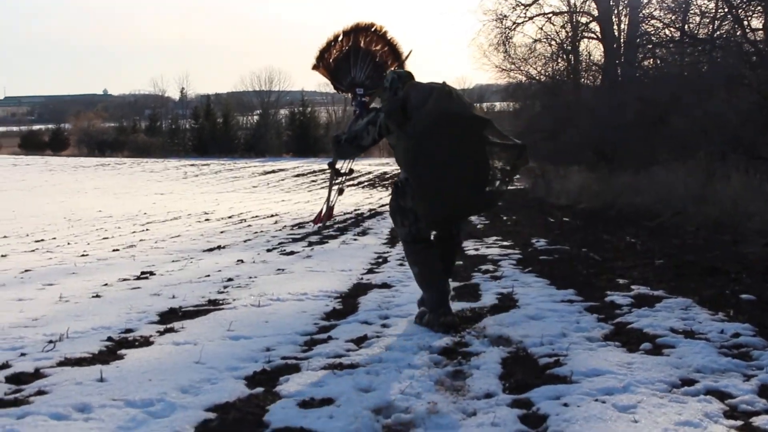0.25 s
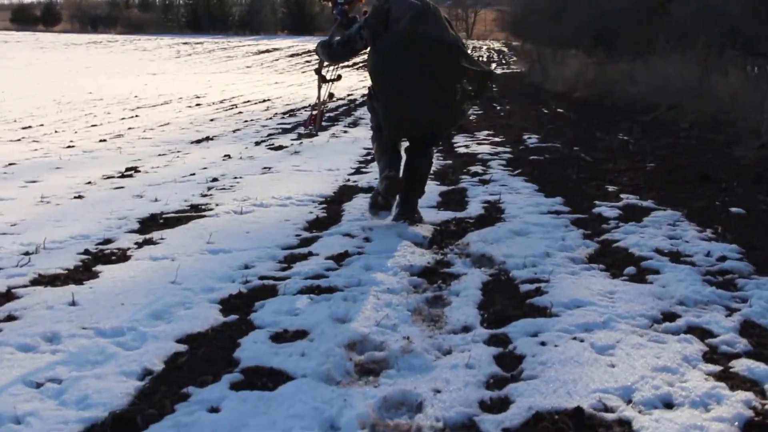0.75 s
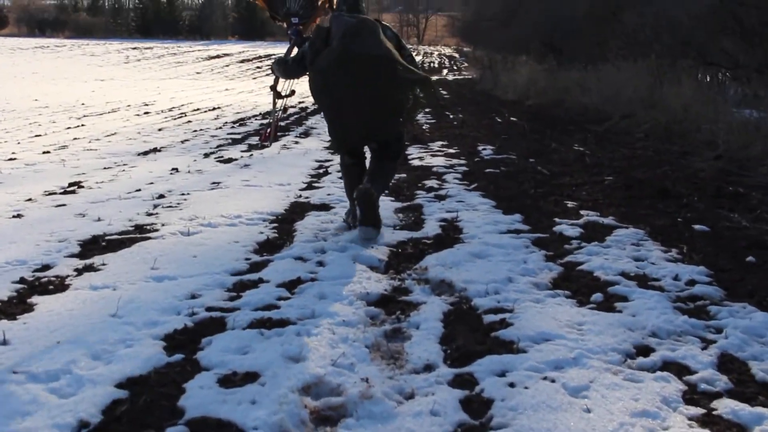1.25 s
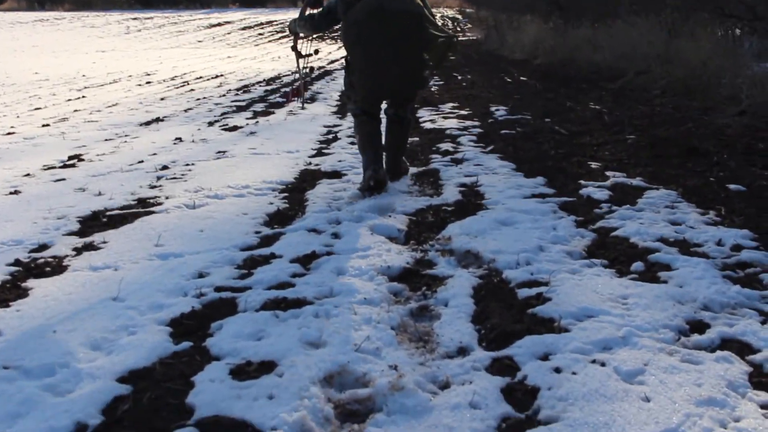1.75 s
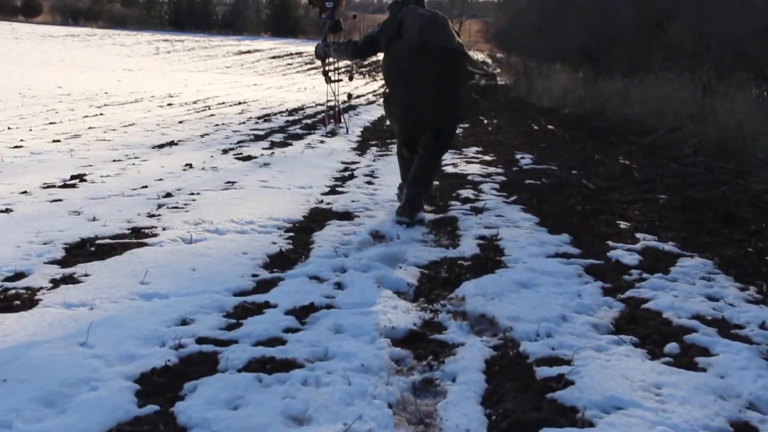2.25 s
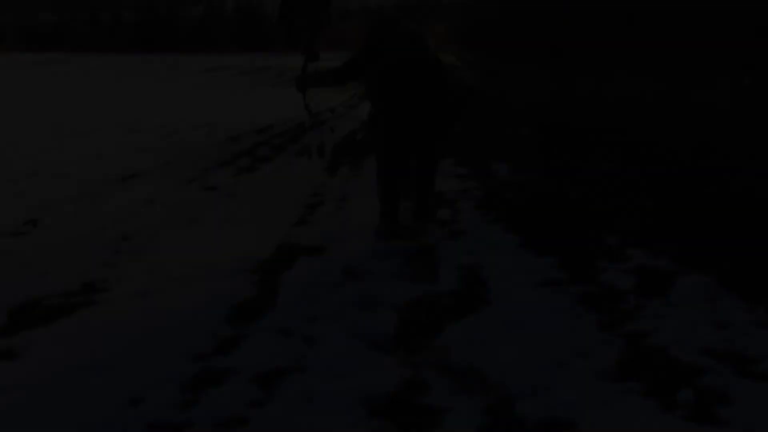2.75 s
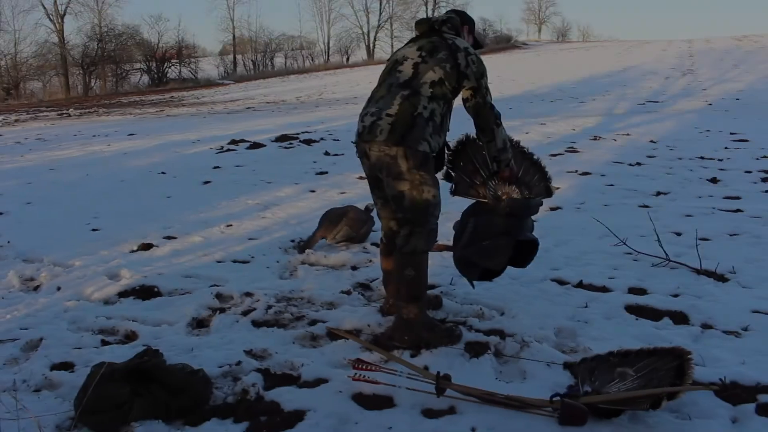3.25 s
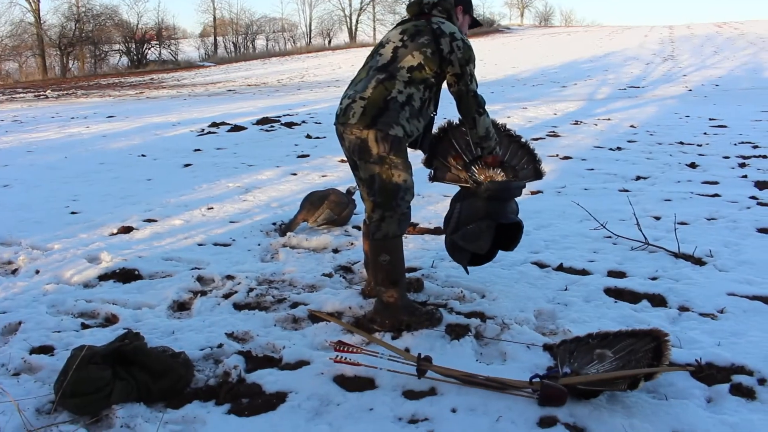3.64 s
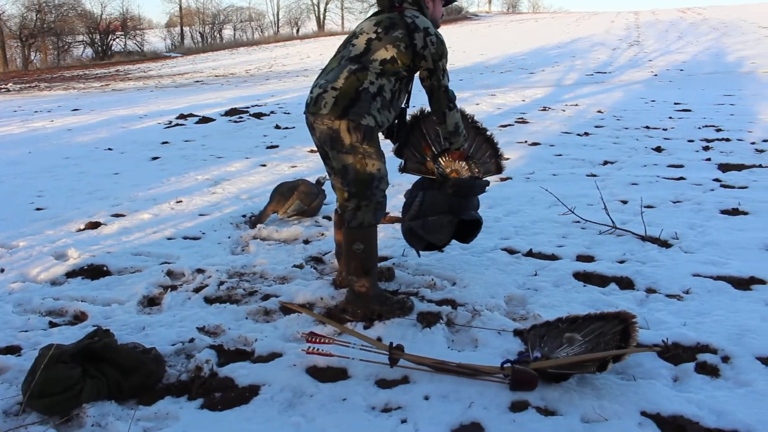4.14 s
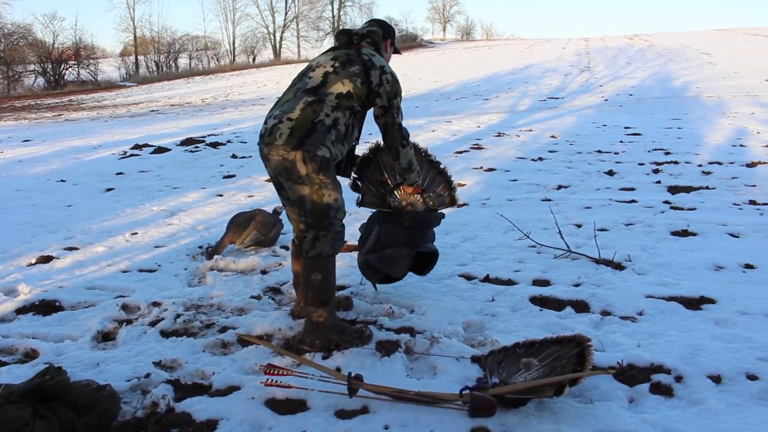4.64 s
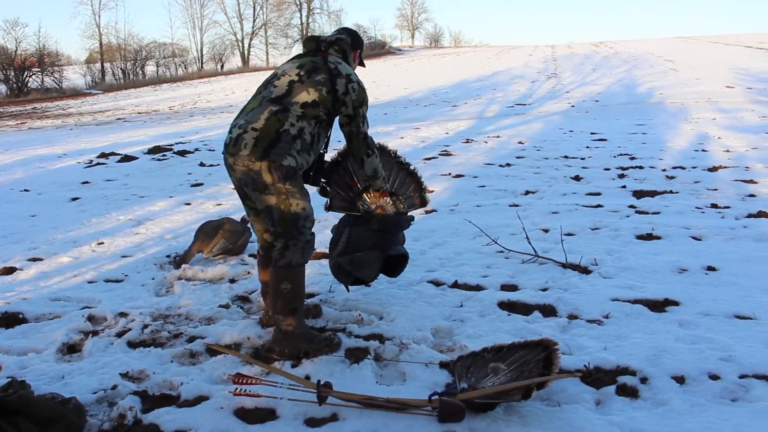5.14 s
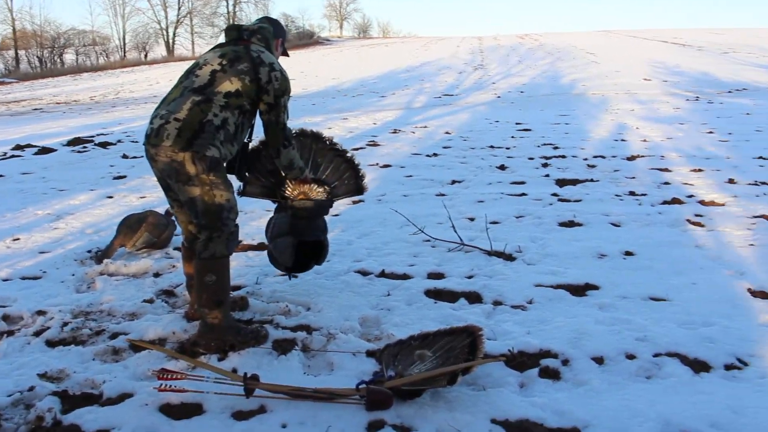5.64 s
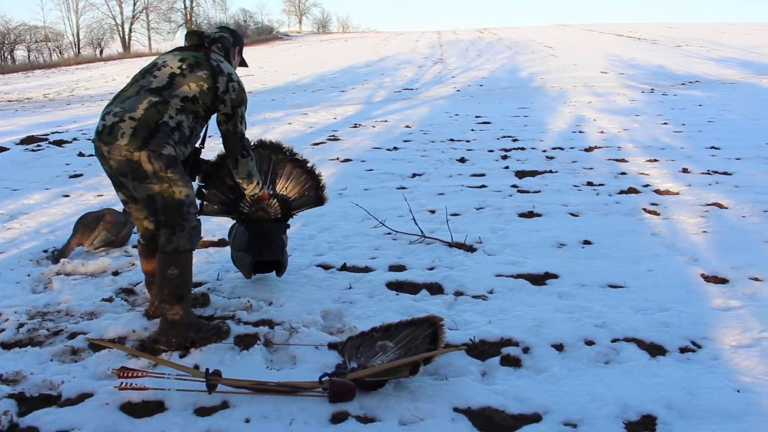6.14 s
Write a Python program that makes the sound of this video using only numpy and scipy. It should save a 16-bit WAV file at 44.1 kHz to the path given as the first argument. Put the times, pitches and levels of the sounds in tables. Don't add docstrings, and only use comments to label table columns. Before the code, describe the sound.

Close, uneven wind blasts overload a hand-held microphone with deep rumble while crisp snow crunches and creaks underfoot. The wind drops away, gritty gear scrapes over the crust, and a soft open field remains, with distant traffic, a low engine drone and thin bird chirps. Two clusters of hollow plastic knocks follow, the first short and dull, the second louder, clattering and ringing.

```python
import sys
import numpy as np
from scipy import signal
from scipy.fft import rfft, irfft, next_fast_len
from scipy.io import wavfile
from scipy.ndimage import uniform_filter1d

SR = 44100
rng = np.random.default_rng(int(sys.argv[2]) if len(sys.argv) > 2 else 0)


def master_out(mix):
    frames = np.transpose(np.atleast_2d(mix))
    ceiling = np.clip(frames, -1, 1)
    pcm = np.round(ceiling * 32767).astype(np.int16)
    wavfile.write(sys.argv[1], SR, pcm)


def boost_factor(decibels):
    exponent = np.asarray(decibels, float) / 20
    return 10 ** exponent


N = 282680
T = np.arange(N) / SR
PAD = next_fast_len(N)
FADE_FROM_S, FADE_TO_S = 2.696, 3.27
WINDY = np.clip((FADE_TO_S - T) / (FADE_TO_S - FADE_FROM_S), 0, 1)


def unit(x):
    return x / np.sqrt(np.mean(x ** 2))


def colour(x, points):
    hz, db = np.transpose(points)
    log_hz = np.log(np.arange(PAD // 2 + 1) * SR / PAD + 1e-3)
    gain = boost_factor(np.interp(log_hz, np.log(hz), db, left=-90, right=-90))
    return unit(irfft(rfft(x, PAD) * gain, PAD)[:N])


def ring(x, modes):
    total = 0
    for hz, width, db in modes:
        total = total + boost_factor(db) * unit(signal.lfilter(*signal.iirpeak(hz, hz / width, SR), x))
    return total


def walk(rate):
    hold = int(SR / rate)
    steps = np.repeat(rng.standard_normal(N // hold + 1), hold)
    return 1.3 * uniform_filter1d(uniform_filter1d(steps, hold), hold)[:N]


def grains(spread_db, hold):
    size = np.minimum(rng.exponential(size=N // hold + 1), 3.5)
    return rng.standard_normal(N) * boost_factor(spread_db * np.repeat(size, hold)[:N])


def lively(points, drift_db, flicker_db, rate, slaps=0):
    spectrum = rfft(colour(rng.standard_normal(N) + slaps, points), PAD)
    half_octave = 2 * np.log2(np.arange(len(spectrum)) * SR / PAD + 1e-3)
    first, last = int(2 * np.log2(points[0][0])), int(2 * np.log2(points[-1][0])) + 1
    out = 0
    for k in range(first, last + 1):
        share = np.cos(np.pi / 2 * np.clip(half_octave - k, -1, 1)) ** 2
        level_db = drift_db * walk(rate / 8) + flicker_db * walk(rate)
        out = out + irfft(spectrum * share, PAD)[:N] * boost_factor(level_db)
    return unit(out)


def burst(length_s, rise_s, fall_s):
    t = np.arange(int((length_s + 6 * fall_s) * SR)) / SR
    return np.minimum(t / rise_s, 1) * np.exp(-np.maximum(t - length_s, 0) / fall_s)


def bell(s, width_s):
    return np.exp(-.5 * ((T - s) / width_s) ** 2)


def swells(rows, width_s=None):
    return sum(boost_factor(row[1]) * bell(row[0], width_s or row[2]) for row in rows)


def add(out, s, x):
    i = int(s * SR)
    out[i:i + len(x)] += x[:N - i]


def echo(x, db, fade_s):
    t = np.arange(SR // 4) / SR
    tail = boost_factor(db) * rng.standard_normal(len(t)) * np.exp(-t / fade_s)
    return x + signal.fftconvolve(x, tail)[:N]


def distance():
    # pitch in Hz, level in dB per Hz.
    road_tone = [(260, -13), (340, -7.5), (480, -5.5), (600, -6.5), (800, -6.5), (1050, -12), (1670, -25.5),
                 (2600, -33.5), (3400, -62)]
    rumble_tone = [(140, -24), (190, -0.5), (240, 1), (330, -4), (430, -11)]
    hiss_tone = [(2120, -16), (3600, 0.5), (3850, -2), (5630, -6), (6210, -6), (7070, -6), (15600, -8)]
    chorus_tone = [(2300, -1.0), (2900, 2), (3300, 4), (3750, -15.0)]
    # pitch in Hz, width in Hz, level in dB.
    engine_tones = [(727.3, 13.4, 1), (498.5, 27, -1), (807, 5, -4), (373, 2.4, -10)]
    # middle in seconds, level in dB, width in seconds.
    engine_swells = [
        (3.56, -46.5, .04),
        (4.25, -43.5, 0.22),
        (4.8, -48.5, 0.33),
        (5.35, -46, 0.054),
        (5.85, -45.5, 0.19),
    ]
    # middle in seconds, level in dB, width in seconds.
    passes = [
        (.15, -43, 0.14),
        (1.5, -55, 0.37),
        (2.55, -48.5, 0.11),
        (3.45, -50, 0.3),
        (4.82, -49, 0.13),
        (5.55, -63, 0.07),
    ]
    # middle in seconds, level in dB, width in seconds.
    lorry = [
        (4.6, -41.5, 0.33),
    ]
    # middle in seconds, level in dB.
    flocks = [(0, -53), (.52, -55), (.72, -65), (1.25, -60), (1.55, -74), (1.88, -56), (2.42, -50),
              (2.72, -54), (3.1, -55.5), (3.45, -53), (4.04, -62), (4.55, -64), (4.85, -51), (5.1, -65),
              (5.48, -63), (5.9, -71)]

    drone = swells(engine_swells) * ring(rng.standard_normal(N), engine_tones)
    road_gain = WINDY * boost_factor(-34) + (1 - WINDY) * boost_factor(-42.5) + swells(passes)
    road = road_gain * lively(road_tone, drift_db=1.2, flicker_db=0.93, rate=10)
    rumble_gain = (1 - WINDY) * (boost_factor(-40) + swells(lorry))
    rumble = rumble_gain * lively(rumble_tone, drift_db=-0.1, flicker_db=2.5, rate=12)
    chorus_gain = boost_factor(-60) + swells(flocks, width_s=0.1)
    chorus = chorus_gain * lively(chorus_tone, drift_db=-3.0, flicker_db=0.5, rate=15.9)
    hiss = boost_factor(-58) * colour(rng.standard_normal(N), hiss_tone)
    return road + rumble + drone + chorus + hiss


def birds():
    # start in seconds, length in seconds, pitch in Hz, level in dB.
    whistles = [(.068, .048, 2375, -46), (2.17, .04, 2365, -43), (3.73, .04, 2222, -52),
                (4.232, .055, 2513, -52), (5.787, .06, 2180, -49), (2.556, .032, 2650, -46),
                (2.66, .035, 2250, -52), (5.73, .03, 2670, -55), (4.585, .095, 3290, -52),
                (4.91, .16, 3260, -50), (5.09, .09, 3270, -55), (4.93, .13, 3000, -55),
                (5.42, .1, 3315, -49.5), (5.44, .09, 3040, -56), (3.53, .07, 2060, -60),
                (3.66, .04, 2665, -57), (4.28, .07, 1970, -59), (5.545, .03, 1985, -59),
                (4.696, .034, 2890, -45), (6.105, .035, 7350, -60), (5.363, .016, 2260, -47),
                (3.675, .022, 2100, -53), (4.69, .03, 3300, -53), (5.28, .02, 3300, -52)]
    # start in seconds, length in seconds, from Hz, to Hz, level in dB.
    slides = [
        (0, .045, 2750, 2450, -46),
        (5.315, .014, 3200, 2500, -42),
        (2.048, .095, 3680, 2500, -50),
        (5.202, .09, 3720, 2430, -38),
        (5.185, .02, 3740, 3640, -54),
        (6.24, .07, 3350, 2800, -48),
        (5.324, .05, 2290, 2170, -45),
        (2.58, .035, 2600, 2120, -47),
        (4.68, .02, 2300, 2850, -50),
    ]
    # start and length in seconds, edge Hz, middle Hz, level in dB.
    bends = [
        (4.12, .11, 3300, 2800, -48.5),
        (5.309, .021, 2350, 3280, -44),
        (.047, .022, 2350, 3250, -45),
        (5.692, .06, 2000, 2660, -51),
    ]
    peak_at = .28
    sag_db = 16
    level_notes = [(s, length_s, hz, hz, db) for s, length_s, hz, db in whistles]

    def slide(u):
        return 1 - (1 - u) ** 1.5

    def bend(u):
        return 1 - np.abs(2 * u - 1) ** 2.4

    out = np.zeros(N)
    waver = 1 + .003 * walk(90)
    for notes, shape, loss_db in (level_notes, slide, sag_db / 3), (slides, slide, sag_db), (bends, bend, 0):
        for s, length_s, from_hz, to_hz, db in notes:
            u = np.arange(int(length_s * SR)) / (length_s * SR)
            edge = np.clip(np.minimum(u * length_s + 0.00089, (1 - u) * length_s) / 0.0058, 0, 1)
            gain = edge * boost_factor(db - loss_db * np.abs(u - peak_at) / (1 - peak_at))
            pitch_hz = (from_hz + (to_hz - from_hz) * shape(u)) * waver[int(s * SR):][:len(u)]
            add(out, s, np.sqrt(2) * gain * np.sin(2 * np.pi * np.cumsum(pitch_hz) / SR))
    return echo(out * boost_factor(1.8 * walk(120)), db=-35, fade_s=.035)


def wind():
    # time in seconds, level in dB.
    gusts = [(0, -22), (.25, -13), (.5, -15), (.7, -20.5), (.85, -16.5), (1.0, -16), (1.31, -20.5),
             (1.55, -15), (1.75, -23.5), (2.05, -23.5), (2.3, -21), (2.45, -22.5), (2.65, -21), (2.8, -20),
             (3.0, -17.5), (3.2, -17.5)]
    # time in seconds, boost in dB, eddy size from 0 small to 1 big.
    buffets = [(0, 16.5, 0.77), (.04, -3.5, 0.41), (.19, 0, 0.86), (.27, 2.5, 0.8), (.35, -4, 0.45),
               (.39, -0.5, .1), (.46, -3, 0.7), (.64, -6, 0.93), (0.771, 4, 0.6), (.99, 1, .2),
               (1.05, 3.5, 0.65), (1.25, -0.5, 0.73), (1.36, 1, .4), (1.478, 7, 0.36), (1.54, -3, 0.61),
               (1.639, 12, 0.78), (1.69, -17, 0.97), (1.84, 3.5, 1), (1.91, 5, 0.16), (1.94, 6, 0.92),
               (1.97, 8.5, .1), (2.08, 8.5, 0.84), (2.23, -13, 0.84), (2.3, 3.5, .1), (2.4, -7, 0.18),
               (2.5, 4, 0.99), (2.54, -4, 0.088), (2.6, 7, 0.76), (2.68, 5, .1), (.09, 0, .5),
               (.15, 2.5, .5), (.23, 2, .3), (.31, -0.5, .4), (.43, 3, .5), (.51, -2.5, .6), (.58, 1, .3),
               (.7, 0.5, .5), (.82, 2, .4), (.88, -1.5, .5), (.93, 0.5, .5), (1.11, -1, .5), (1.17, 1, .4),
               (1.21, 1.5, .3), (1.3, -3, .5), (1.42, -1, .5), (1.59, 2, .5), (1.77, 0.5, .5),
               (2.02, 0, .5), (2.15, 0, .5), (2.75, -1, .5), (2.82, 1, .5), (2.9, 0, .5), (2.98, 0.5, .5),
               (3.07, -1, .5)]
    # pitch in Hz, level in dB per Hz.
    heave_tone = [(8.8, -50), (15, 3), (42, 2), (68, 5), (95, -3), (120, 1), (200, -120)]
    flutter_tone = [(50, -15.5), (70, -5), (115, -0.5), (160, -7.5), (200, -21)]
    rattle_tone = [(135, -33), (170, 1), (230, -1.5), (310, -12.5), (420, -21.5)]
    breeze_tone = [(15, 2), (30, -4), (65, 0), (100, -8.5), (140, -3.5), (180, -9.5)]

    slaps = boost_factor(-1.5) * unit((rng.random(N) < 45 / SR) * rng.random(N))
    gust_db = np.interp(T, *np.transpose(gusts))
    big_db, small_db = gust_db, gust_db
    for s, db, size in buffets:
        boost_db = db * bell(s, width_s=0.023)
        big_db = big_db + np.clip(2 * size, 0, 1) * boost_db
        small_db = small_db + np.clip(2 - 2 * size, 0, 1) * boost_db

    heave = boost_factor(big_db - 1.5) * lively(heave_tone, drift_db=-3.5, flicker_db=1.0, rate=8.1)
    flutter = boost_factor(small_db) * lively(flutter_tone, drift_db=1.0, flicker_db=2.04, rate=26, slaps=slaps)
    rattle_db = -6.5 - 2.5 * T + small_db + 0.13 * (small_db + 19)
    rattle = boost_factor(rattle_db) * lively(rattle_tone, drift_db=3.0, flicker_db=0.5, rate=16.4, slaps=slaps)
    breeze = boost_factor(-38.5) * lively(breeze_tone, drift_db=-0.9, flicker_db=1.5, rate=10)
    wind_db = -.7
    total = WINDY * boost_factor(wind_db) * (heave + flutter + rattle) + (1 - WINDY) * breeze
    push = 0.18 * total ** 2
    return total + push - uniform_filter1d(push, size=2000)


def boots():
    # start in seconds, level in dB, dull share in dB, length in seconds.
    crunches = [(0.18, -50.5, -3, 0.052), (0.208, -40.5, -25, 0.025), (0.383, -55, 3, 0.053),
                (0.439, -52, 4, 0.081), (0.604, -52.5, 12.5, 0.036), (0.749, -57, 13, 0.019),
                (0.794, -54.5, 3, 0.047), (1.016, -47.5, -3, 0.08), (1.127, -62, 15.5, 0.087),
                (1.225, -47.5, 6, 0.014), (1.389, -58.5, 10.5, 0.037), (1.44, -55, -9, 0.041),
                (1.523, -63, 1, .012), (1.565, -59, 11, 0.014), (1.669, -50.5, 0, 0.065),
                (1.74, -57.5, 12, 0.063), (1.869, -58.5, 16.5, 0.016), (1.905, -46.5, 6, 0.007),
                (2.205, -51, 10.5, 0.007), (2.268, -51, 7.5, 0.056), (2.506, -55, 5, 0.053),
                (2.689, -49, 0, 0.0083), (2.728, -47, 1, 0.019), (2.774, -37.5, -6.5, 0.037),
                (2.997, -58, 10, 0.0092), (3.087, -58, 15.5, 0.049), (3.141, -43.5, 2, 0.034),
                (3.216, -52.5, 10, 0.02), (3.304, -55.5, 12.5, 0.025)]
    # start in seconds, level in dB.
    ticks = [
        (3.809, -58),
        (3.847, -54),
        (4.398, -63),
        (4.43, -71),
        (5.167, -54),
        (5.234, -49),
        (5.251, -53),
    ]
    # middle in seconds, level in dB.
    steps = [
        (0, -60),
        (.68, -55.5),
        (1.22, -49.5),
        (1.55, -59),
        (1.88, -55),
        (2.12, -60),
        (2.42, -55),
        (2.65, -61),
        (3.15, -54.5),
        (3.42, -57),
    ]
    # time in seconds, level in dB.
    drag = [
        (3.28, -70),
        (3.34, -49),
        (3.39, -38.5),
        (3.45, -43),
        (3.51, -48),
        (3.57, -55),
        (3.72, -62),
        (3.8, -72),
    ]
    # pitch in Hz, width in Hz, level in dB.
    gear_modes = [(2100, 250, -6), (2530, 200, -2), (2950, 300, -2), (3350, 250, -2), (3750, 130, 0),
                  (4180, 110, 2), (4500, 160, -3), (4800, 200, -7)]
    # pitch in Hz, level in dB per Hz.
    crust_tone = [(1290, -45), (2200, -45), (2490, -9), (3510, 1.5), (4030, -3.5), (5330, -5.5), (9380, -7),
                  (15600, -10.5)]
    packing_tone = [(1100, -4), (1700, -2.5), (2600, -2.5), (3200, 2.5), (3800, -10), (5500, -16)]
    gear_tone = [(1500, -3), (2200, -2), (4800, -6.5), (5600, -10.5), (15600, -5)]

    settling = WINDY * boost_factor(-63)
    bright = swells(steps, width_s=0.11) + settling
    dull = np.zeros(N)
    short_ticks = [(s, db, 6.5, 0.0073) for s, db in ticks]
    for s, db, dull_db, length_s in crunches + short_ticks:
        snap = burst(length_s, rise_s=0.003 + 0.12 * length_s, fall_s=0.002 + 0.16 * length_s)
        creak = burst(length_s, rise_s=0.0036 + 0.17 * length_s, fall_s=0.0038 + 0.6 * length_s)
        add(bright, s, boost_factor(db) * snap)
        add(dull, s, boost_factor(db + dull_db) * creak)
    crust = colour(grains(spread_db=1.8, hold=24), crust_tone) * boost_factor(2.2 * walk(45))
    packing = colour(grains(spread_db=2.2, hold=40), packing_tone) * boost_factor(1.5 * walk(60))
    gear = colour(ring(grains(spread_db=0.0, hold=40), gear_modes), gear_tone)
    drag_gain = boost_factor(np.interp(T, *np.transpose(drag), left=-99, right=-99))
    return bright * crust + dull * packing + drag_gain * gear


def decoy():
    # start in seconds, thud peak in dB, thud pitch in Hz, grit in dB.
    slips = [(4.729, -23, 231, -34.5), (4.745, -17, 510, -28.5), (4.76, -12, 477, -36),
             (4.765, -12, 374, -42), (4.774, -9.5, 420, -35), (4.788, -13, 277, -35),
             (4.795, -10, 262, -43), (4.827, -11, 333, -27.5), (4.834, -11, 298, -50),
             (4.839, -5.5, 373, -37), (4.848, -8, 444, -34), (4.863, -11.5, 393, -33), (4.87, -3, 393, -56)]
    # start in seconds, thud peak in dB, thud pitch in Hz, grit in dB, shell ring in dB.
    knocks = [(6.149, -20, 450, -31, -18), (6.157, -5.5, 380, -36, -10.5), (6.167, -5, 338, -29, -22),
              (6.176, -1.5, 492, -30, -5.5), (6.188, -20, 400, -38, -22), (6.2, -11.5, 420, -52, -40),
              (6.211, -25, 400, -38, -34), (6.222, -3, 358, -37.5, -17), (6.231, -3, 374, -41, -28),
              (6.244, -11, 420, -38, -26), (6.253, -16, 397, -39, -26), (6.264, -12, 444, -44, -26),
              (6.283, -19, 348, -38.5, -32), (6.307, -20, 328, -35.5, -29), (6.323, -20, 318, -18.5, -40),
              (6.333, -29, 293, -25, -37), (6.341, -11.5, 354, -54, -44), (6.345, -8, 200, -58, -47),
              (6.362, -18, 260, -30.5, -39), (6.372, -12.5, 214, -32.5, -29), (6.39, -19, 173, -37.5, -42)]
    # start in seconds, level in dB.
    cracks = [(4.727, -34), (4.748, -28), (4.755, -27), (4.759, -27), (4.793, -32), (4.824, -31),
              (4.83, -27), (4.835, -27), (4.84, -29), (4.868, -27), (4.874, -32), (6.151, -29),
              (6.167, -25), (6.177, -19), (6.213, -32), (6.232, -30), (6.251, -31), (6.265, -32),
              (6.309, -33), (6.326, -20), (6.333, -18), (6.339, -21), (6.345, -24), (6.363, -26),
              (6.377, -26)]
    # pitch in Hz, width in Hz, level in dB.
    shell_modes = [(837, 46, -1), (945, 58, -5), (1446, 75, -16), (1800, 64, -19), (2060, 62, -16),
                   (2200, 53, -21), (3620, 140, -17)]
    # pitch in Hz, level in dB per Hz.
    grit_tone = [(650, -11), (1100, 3), (1230, -3), (1660, 1), (2500, -3.5), (3730, -7), (4860, -16),
                 (12600, -27.5), (15600, -28)]
    body_tone = [(120, -19), (250, 8.0), (450, 0.0), (900, 0.0), (1200, -14)]
    skin_tone = [(700, -10), (1700, 0), (3500, -3), (6500, -12), (15600, -22)]

    thud, shell, scrape, snap = np.zeros(N), np.zeros(N), np.zeros(N), np.zeros(N)
    t = np.arange(SR // 8) / SR
    gripped = [(*slip, -43) for slip in slips]
    for s, db, hz, grit_db, shell_db in gripped + knocks:
        cycles = t * hz / 0.62
        add(thud, s, -boost_factor(db + 5.0) * np.sin(2 * np.pi * hz * t) * cycles * np.exp(-cycles))
        for mode_hz, width, mode_db in shell_modes:
            mode_hz = mode_hz * (1 + .003 * np.sin(40 * s + mode_hz))
            swell = (1 - np.exp(-t / 0.0029)) * np.exp(-np.pi * width * t)
            tone = np.sin(2 * np.pi * mode_hz * (s + t))
            add(shell, s - .002, boost_factor(shell_db + mode_db + 5.5) * tone * swell)
        add(scrape, s, boost_factor(grit_db) * burst(0.009, rise_s=0.0042, fall_s=0.0044))
    for s, db in cracks:
        add(snap, s, boost_factor(db) * burst(0, rise_s=0.00045, fall_s=0.0012))

    grit = colour(grains(spread_db=3.2, hold=30), grit_tone)
    body = boost_factor(1.5) * colour(rng.standard_normal(N), body_tone)
    skin = colour(rng.standard_normal(N), skin_tone)
    return echo(thud + shell + scrape * (grit + body) + snap * skin, db=-37.5, fade_s=0.027)


def scene():
    return (distance() + birds() + wind() + boots() + decoy())[None]


def band_limit(x):
    return signal.sosfilt(signal.butter(12, 15740, fs=SR, output="sos"), x)


def record(dry):
    rounded = 1.067 * np.tanh(dry / 1.062)
    return band_limit(rounded)


dry = scene()
out = record(dry)
master_out(out)
```